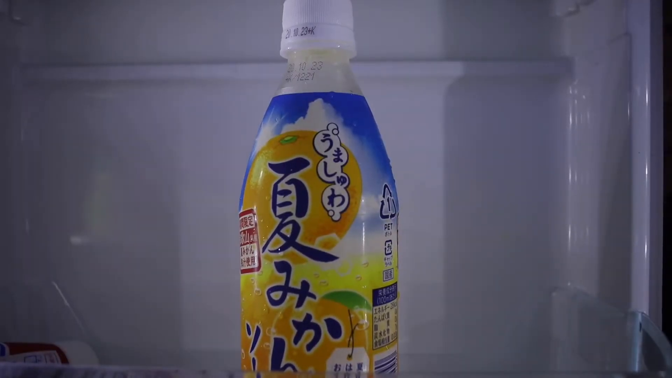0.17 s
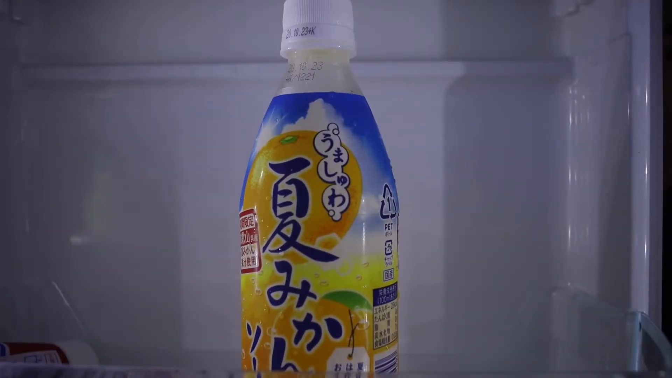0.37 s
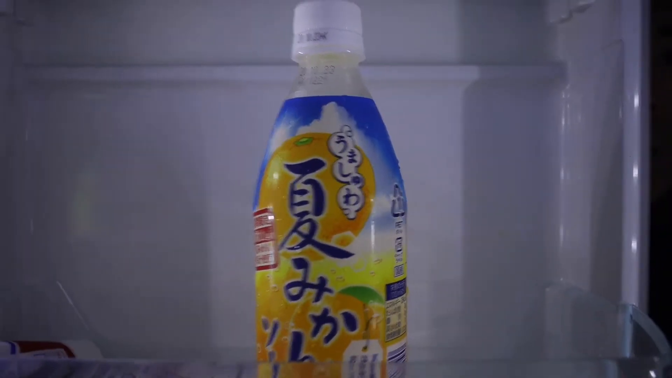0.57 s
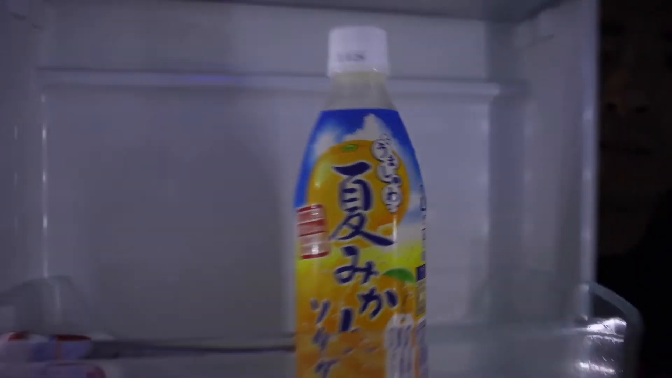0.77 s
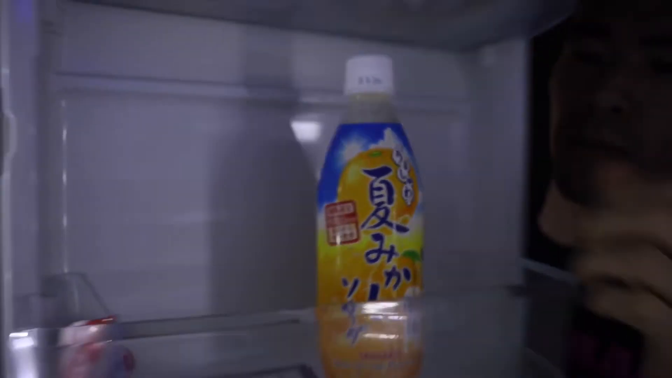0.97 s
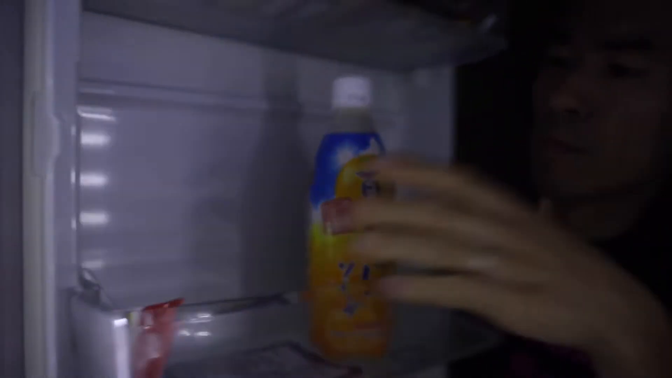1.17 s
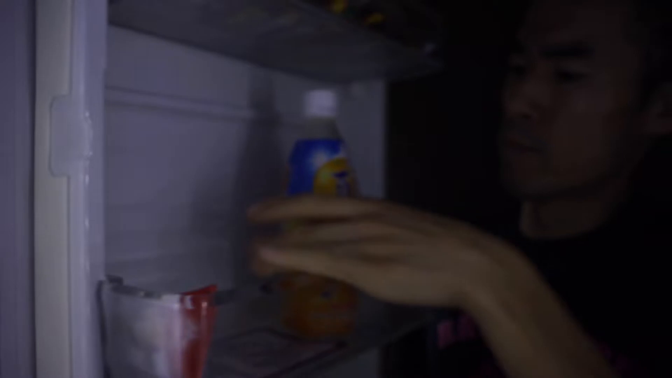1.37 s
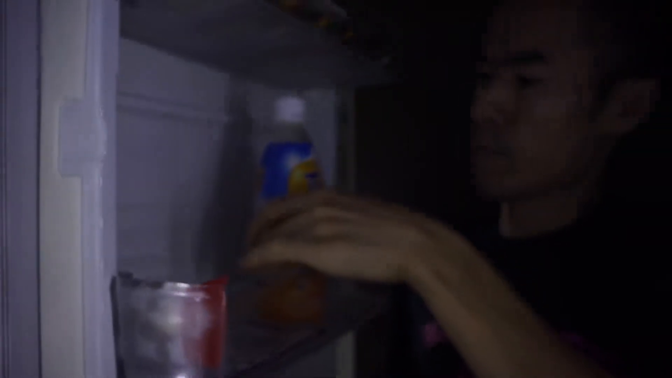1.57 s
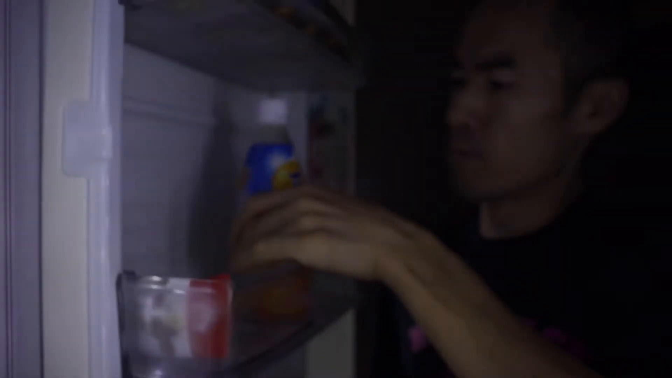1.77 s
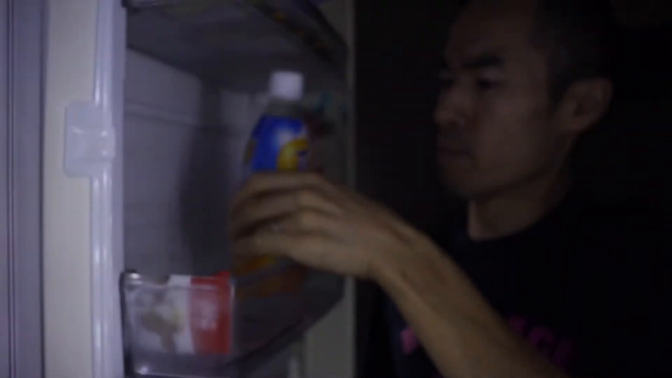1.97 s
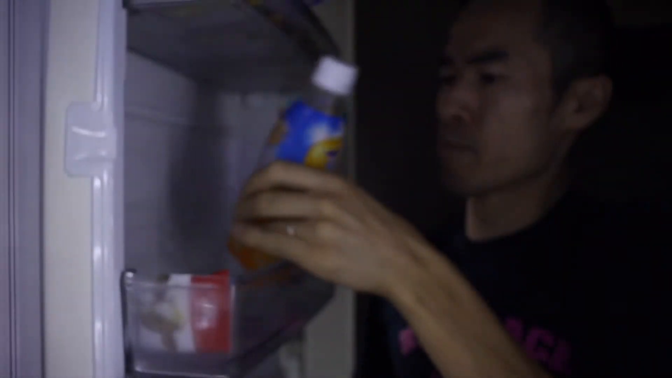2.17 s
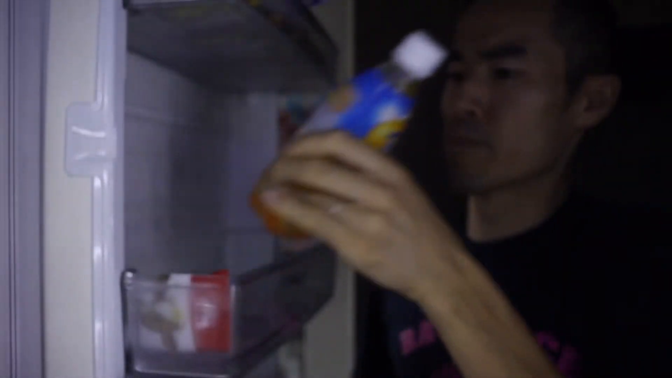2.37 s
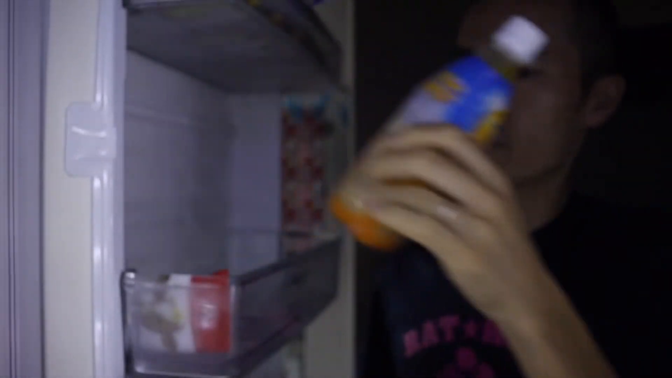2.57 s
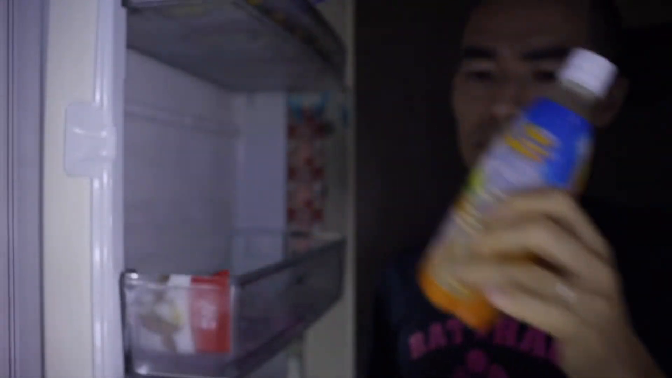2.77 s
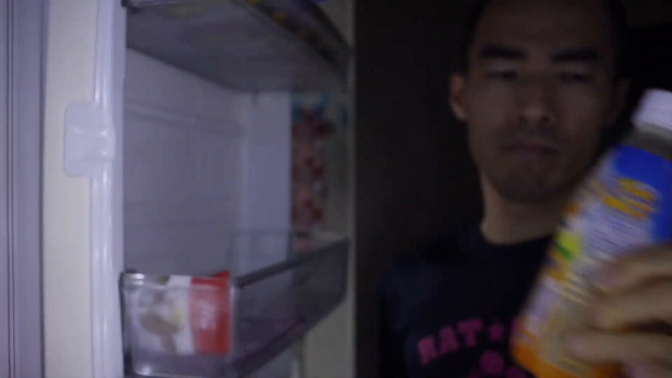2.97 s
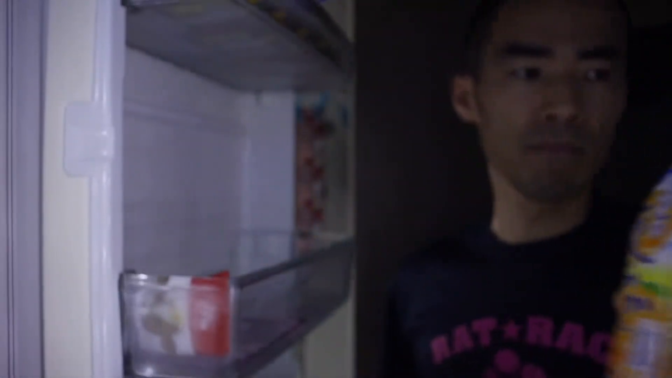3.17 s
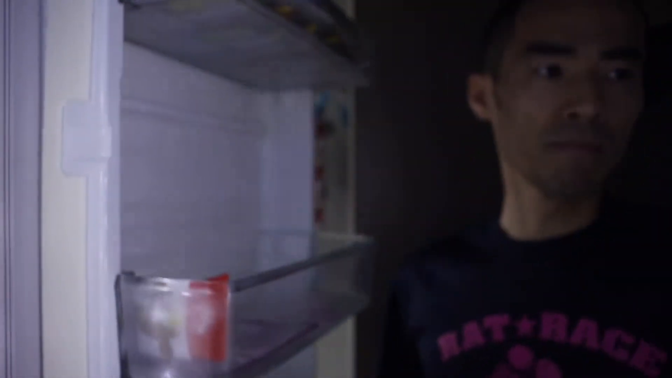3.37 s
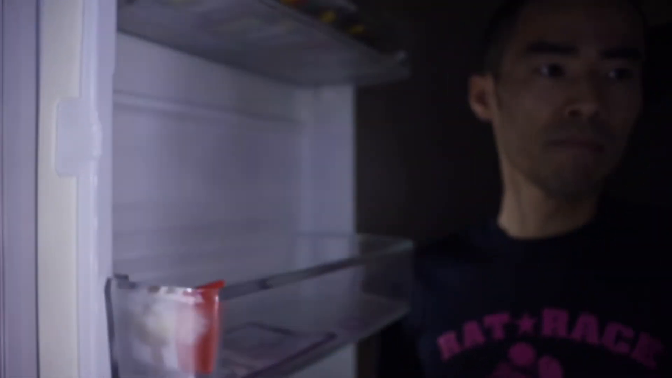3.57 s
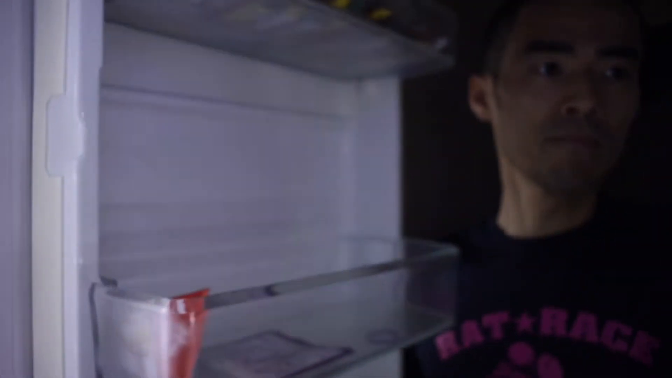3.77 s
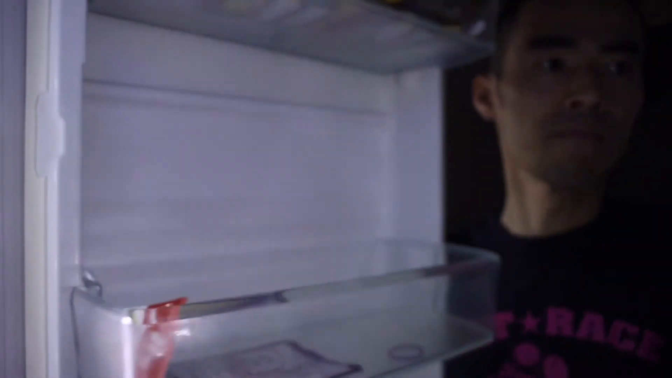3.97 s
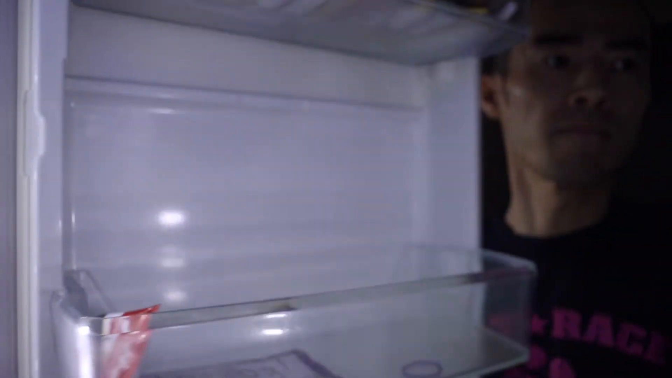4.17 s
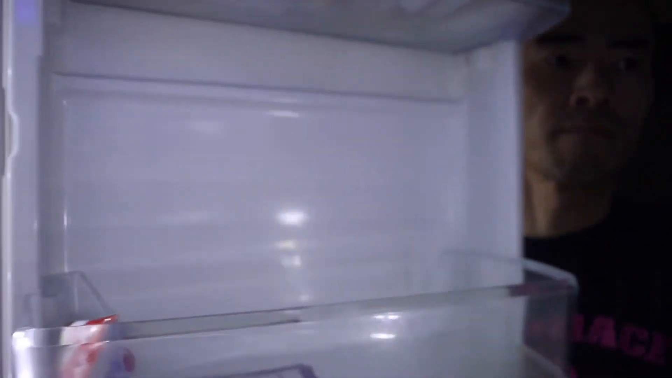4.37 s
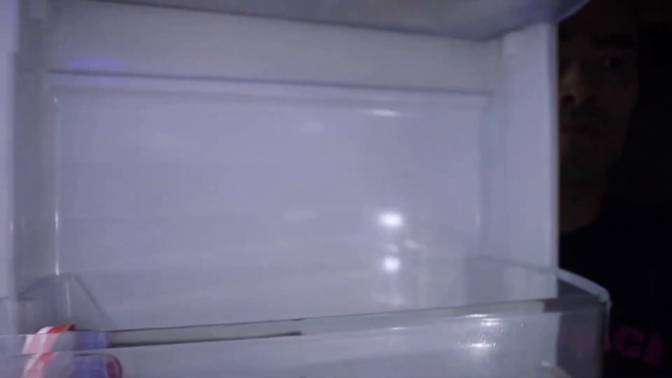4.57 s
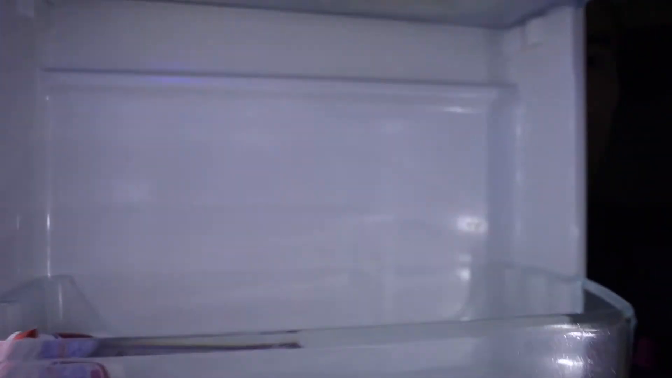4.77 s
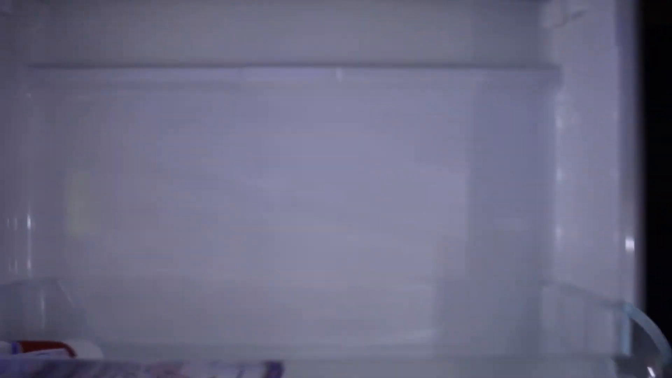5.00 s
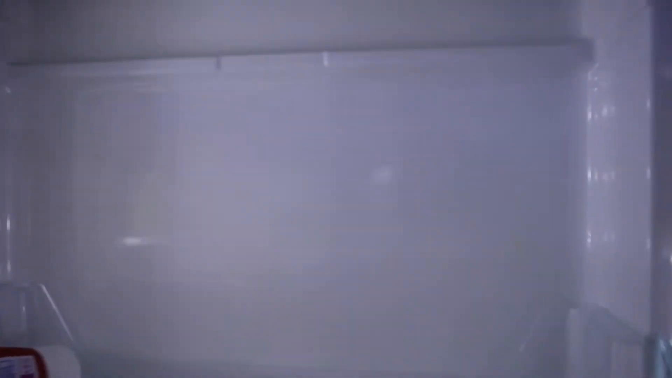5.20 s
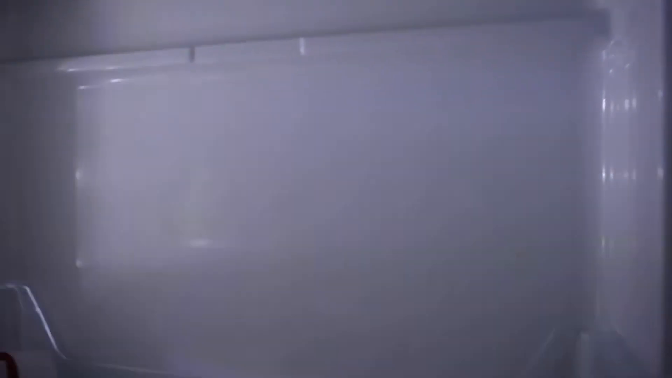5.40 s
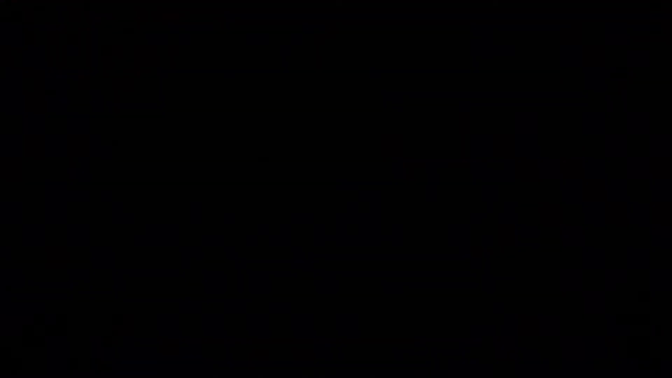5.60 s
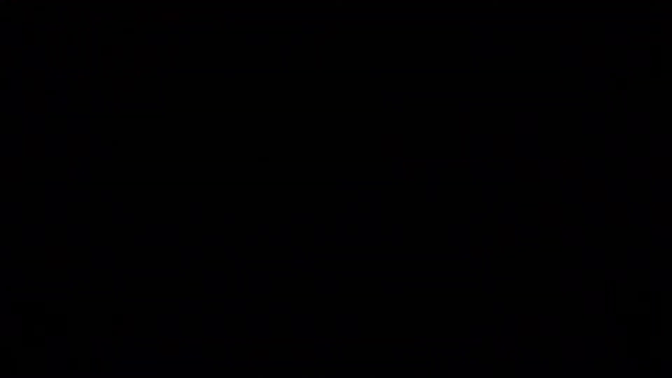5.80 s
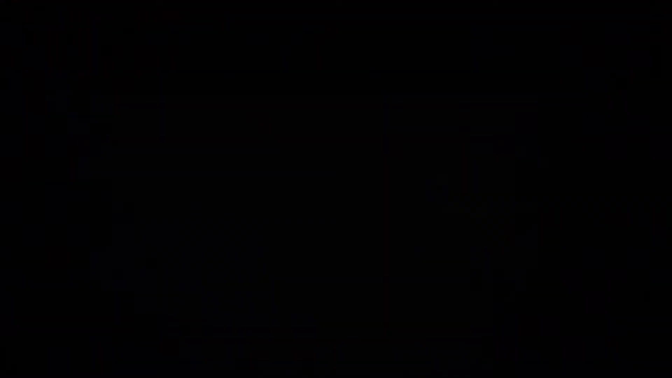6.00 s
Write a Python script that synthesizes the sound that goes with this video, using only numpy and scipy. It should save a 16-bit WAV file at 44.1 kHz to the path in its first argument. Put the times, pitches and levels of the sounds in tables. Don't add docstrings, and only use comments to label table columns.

```python
import sys
import numpy as np
from scipy import signal
from scipy.fft import rfft, irfft, next_fast_len
from scipy.io import wavfile
from scipy.ndimage import uniform_filter1d

SR = 44100
rng = np.random.default_rng(int(sys.argv[2]) if len(sys.argv) > 2 else 0)


def boost_factor(decibels):
    exponent = np.asarray(decibels, float) / 20
    return 10 ** exponent


def wav_record(signal):
    frames = np.transpose(np.atleast_2d(signal))
    bounded = np.clip(frames, -1, 1)
    quanta = np.round(bounded * 32767).astype(np.int16)
    wavfile.write(sys.argv[1], SR, quanta)


N = 266408

# frequency in Hz, level in dB per Hz.
HUSH = [(18, -31), (33, -0.5), (48, 2), (110, -8), (189, -5.5), (240, -13.5), (1220, -21.5), (15500, -35.5)]
HUSH_DB = -57.5

# frequency in Hz, level in dB, decay time T60 in seconds.
WALLS = [(91, -11, 0.14), (118, -4, 0.29), (151.6, -4, 0.2), (180, -2, 0.2), (230, -4.5, .12),
         (265.5, -3, 0.14), (311.4, -2, 0.17), (354, -7, 0.13), (412, -6.5, 0.099)]
RACKS = [(485.8, -1, 0.054), (534, -1.5, 0.088), (693, -3, 0.073), (774, -4.5, 0.084), (880, 2, 0.068),
         (926, -15.5, 0.028), (1160, -12.5, 0.029), (1350, -3.5, 0.079), (1590, -7.5, .03),
         (1756, 8.5, 0.017), (1920, 1, 0.04), (2085, -5.5, 0.036), (2270, -4.5, 0.028)]
LINER = [(2748, 3, 0.018), (3080, 0, 0.017), (3185, 1, 0.014), (3808, -8, 0.03), (3932, -13, 0.027),
         (4200, -3, 0.0092), (4490, -8.5, 0.027), (5227, -5.5, .012), (6960, -8, 0.013)]
BOTTLE = [(770, -2, .06), (860, -3, .07), (1116, -1.5, 0.058), (1370, 4, .055), (1900, -4, .03),
          (1800, 4.5, .03), (2150, 0, .04), (2440, 1, 0.028)]
LATCH = [(650, -6, 0.03), (925, 4, 0.088), (1204, 8, 0.027), (1370, -5, .04), (1800, 5.5, 0.037),
         (2040, 4, 0.039)]
FRAME = [(564, 2, 0.053), (885, -6, 0.056), (1140, -15, 0.03), (1375, 11, 0.05), (1690, 9, .015),
         (1900, 14.5, 0.015), (2056, 1, 0.033), (2360, 5, 0.032)]

# time in seconds, level in dB.
SWAY = [(0, -47), (.3, -45.5), (.75, -46.5), (.95, -51), (1.75, -51.5), (1.95, -63), (2.7, -71),
        (3.1, -60.5), (3.55, -52), (4.1, -54), (5.08, -60), (5.28, -38), (5.54, -41.5), (6.04, -46)]
# time in seconds, level in dB.
SHAKE = [(0, -45.5), (.27, -51), (.79, -47), (1.2, -49), (1.41, -34), (1.72, -51), (2.15, -61), (3.05, -63),
         (3.22, -53), (3.58, -53.5), (3.75, -64.5), (4.07, -43.5), (4.38, -61.5), (5.0, -61), (5.27, -35),
         (5.54, -35.5), (5.72, -42.5), (6.04, -46.5)]
# time in seconds, level in dB.
BRUSH = [(0, -59.5), (.9, -60.5), (1.05, -52), (1.28, -55), (1.33, -48), (1.48, -60.5), (1.8, -57.5),
         (2.1, -67.5), (3.1, -62.5), (3.7, -66), (4.9, -70.5), (5.28, -60.5), (5.7, -64.5), (6.04, -74.5)]
# frequency in Hz, level in dB.
RUBBED = [(300, -10), (450, 3.5), (900, 0), (1100, -8.5), (1370, 1), (1600, -6.5), (2400, -13),
          (3200, -35.5)]

# start in seconds, end in seconds, rack level in dB, liner in dB above it.
SCRAPES = [
    (0.164, 0.217, -36.5, -10.5),
    (1.215, 1.303, -40, -24),
    (1.987, 2.086, -65.5, -12),
    (4.001, 4.054, -50, -11),
    (4.039, 4.08, -58, -5),
    (3.105, 3.156, -59, -4.5),
    (5.258, 5.374, -38.5, -20),
    (5.53, 5.577, -48, -6.5),
]
# start in seconds, peak in dB, fade in ms, low edge in Hz, high edge in Hz.
RUSTLES = [(.008, -42, 5.4, 1000, 2200), (.208, -15.5, 5.3, 1500, 5000), (.567, -34, 4, 1800, 3730),
           (.815, -41, 5, 300, 1500), (1.335, -24, 14, 600, 2300), (1.376, -21.5, 8.4, 600, 2400),
           (1.24, -26, 13.6, 201, 418), (1.98, -50.5, 25, 1602, 2100), (3.11, -39.5, 8.5, 699, 5000),
           (3.232, -47, 11, 500, 1100), (3.39, -43, 6, 1200, 2290), (3.578, -37, 5.8, 600, 3500),
           (4.04, -38, 9.7, 3010, 6000), (4.142, -46, 6.8, 1600, 2198), (5.045, -49, 5, 1700, 3000),
           (5.545, -39.5, 13, 2500, 14000), (5.692, -42, 6.1, 900, 2090), (5.735, -48, 8.6, 1100, 1600),
           (5.79, -50, 5.6, 1000, 2000), (5.838, -46, 5.9, 1000, 1700), (5.898, -44, 5.6, 1000, 2100),
           (5.94, -42.5, 6.8, 1000, 2000), (5.96, -38, 4.9, 1200, 3300), (5.97, -36, 3.8, 400, 4900),
           (5.996, -37.5, 7.5, 1000, 2360), (4.1, -35, 5, 2000, 5000), (4.052, -39, 8, 3300, 5300),
           (4.92, -58, 25, 4050, 4350)]
# start in seconds, peak in dB, fade in ms, low edge in Hz, high edge in Hz.
EDGES = [(.5725, -27, 3, 600, 3500), (1.2, -37, 2, 7000, 15500), (1.3108, -10, 2.7, 6400, 10400),
         (1.3108, -18, 2.03, 12990, 16500), (5.107, -34, 5, 4000, 15500), (5.134, -36, 4, 8000, 15500),
         (5.3668, -8.5, 3.3, 2500, 3800), (5.835, -44, 2, 12000, 16000), (3.884, -25, 5, 3500, 4400),
         (5.975, -30, 6.1, 680, 2400), (5.975, -41, 5, 2800, 6000), (5.135, -25, 5, 1500, 5500),
         (5.0915, -23, 4.5, 2400, 3200), (5.3095, -38, 5, 5000, 15500), (5.549, -40, 3, 3000, 14000)]
# start in seconds, peak in dB, fade in ms, low edge in Hz, high edge in Hz.
SNAPS = [
    (1.3106, -3.5, 1.4, 5000, 15100),
    (1.3106, -10, 6, 1400, 2000),
    (1.311, -18.5, 17, 1199, 8500),
    (5.367, -3, 0.99, 4000, 15000),
    (5.367, -5.5, 3.9, 1800, 7500),
    (5.368, -20.5, 12, 2500, 13000),
    (5.2394, -25.5, 2, 3000, 15000),
]

# time in seconds, peak in dB, wall pitch in Hz.
OPENING = [(0.088, -25.5, 118), (0.13, -22, 118), (0.147, -18.5, 115), (0.219, -21, 412),
           (0.227, -23.5, 149), (0.229, -22.5, 276), (0.544, -24, 243), (0.578, -23, 242),
           (0.644, -35.5, 210), (0.676, -24, 248), (0.905, -30.5, 96), (0.966, -24, 283)]
ROCKING = [(1.25, -21, 267.5), (1.274, -19, 247), (1.317, -24, 407), (1.345, -33, 261), (1.38, -25, 350),
           (1.423, -28.5, 169), (1.465, -30.5, 294), (1.713, -24, 206), (1.894, -26.5, 138.4),
           (2.012, -42, 192), (2.549, -47, 159)]
SWINGING = [(3.098, -25.5, 130), (3.124, -26, 180), (3.159, -32, 167.4), (3.239, -39, 182),
            (3.394, -31.5, 303), (3.434, -33.5, 303), (3.514, -25.5, 304), (3.583, -23.5, 311.6),
            (3.89, -26.5, 104.5), (3.954, -28.5, 112), (4.048, -21.5, 106), (4.164, -30.5, 260),
            (4.29, -35, 118), (4.444, -31, 170.2), (4.94, -41.5, 95.5)]
SHUTTING = [(5.043, -24, 106), (5.092, -22.5, 131.5), (5.125, -15, 85.7), (5.162, -16, 87.4),
            (5.199, -35, 86.1), (5.241, -16, 318), (5.251, -13.5, 180), (5.299, -20, 90.5),
            (5.551, -21, 92), (5.605, -25, 92), (5.702, -28.5, 91), (5.75, -31.5, 134), (5.832, -31, 112.4),
            (5.978, -28.5, 88.8)]
# frequency in Hz, peak in dB, T60 in seconds, start in seconds.
THUMP = [
    (74, 6.5, .105, 5.3787),
    (75.4, -14.5, .95, 5.3787),
    (42, -11, .1, 5.376),
    (115, -4, .06, 5.3695),
    (201, -28, .8, 5.42),
    (170, -17, .1, 5.385),
]

# start in seconds, peak in dB, pitch in Hz, T60 in seconds.
TONES = [(.045, -39, 4400, 0.046), (.09, -23, 1944, 0.04), (0.158, -34, 3900, 0.07),
         (.219, -18.5, 1960, 0.046), (1.312, -7, 3150, 0.026), (1.318, -18.5, 780, 0.081),
         (1.312, -16, 1373, .07), (.228, -20, 528, 0.085), (1.895, -28, 489, 0.1),
         (3.885, -25, 3100, 0.041), (3.886, -25, 1910, 0.04), (0.540, -26.5, 1365, 0.058),
         (0.762, -38.5, 1375, 0.041), (5.367, -8, 1700, 0.029), (5.378, -22, 1390, 0.058),
         (5.163, -20.5, 3900, 0.018), (5.2393, -6, 1185, 0.022), (5.241, -25, 937, 0.11),
         (5.974, -37, 2640, 0.031)]
# start in seconds, peak in dB, pitch in Hz, T60 in seconds.
SEAL_RING = (0.225, -19, 118, .27)
# start in seconds, peak in
# dB, pitch in Hz, T60 in seconds.
RINGS = [(.092, -28.5, 330, 0.064), (.128, -27, 337, .08), (.219, -14.5, 780, 0.045),
         (.222, -27, 1140, 0.09), (.535, -28, 135, .15), (.6, -44, 140, .15), (.665, -24, 132, 0.077),
         (.54, -26, 704, .04), (1.311, -20, 5440, 0.037), (1.311, -16, 5920, 0.039),
         (1.311, -16.5, 6810, 0.025), (1.311, -15, 3670, 0.04), (1.311, -10, 2830, 0.042),
         (1.311, -23, 4590, .04), (3.59, -34.5, 748, .06), (3.893, -34, 510, 0.072), (3.93, -52, 1900, .2),
         (3.955, -45, 856, .09), (3.94, -58, 4250, .2), (4.012, -43, 844, .1), (4.03, -37.5, 1915, 0.13),
         (4.075, -51.5, 2750, .2), (4.165, -47, 1370, 0.083), (5.045, -49, 1900, 0.034),
         (5.246, -12, 925, .035), (5.345, -21, 149, .12), (5.365, -9, 285, 0.042),
         (5.366, -15.5, 385, 0.045), (5.372, -22, 542, .09), (5.4, -35, 430, 0.5), (5.43, -35, 330, 1.1),
         (5.49, -26, 201, 0.14), (5.607, -44, 2040, 0.035), (5.974, -34.5, 1900, 0.038),
         (5.974, -34.5, 625, 0.047), (1.311, -12.5, 1632, .06), (1.312, -11.5, 1805, 0.051),
         (1.555, -36.5, 305, .18), (1.39, -26.5, 171, 0.19), (2.01, -41.5, 190, 0.34), (3.17, -36, 180, .2),
         (3.6, -34.5, 191, .2), (3.585, -36.5, 100, 0.24), (5.39, -15, 175, 0.082),
         (5.405, -21.5, 253, 0.076), (5.54, -25.5, 205, .15), (5.55, -35.5, 535, .12),
         (5.367, -9, 1900, 0.038), (5.95, -33, 60, .2),
         (1.25, -27, 1250, .07),
    (1.25, -29, 1800, .05),
    (.67, -30, 1370, .06),
    (5.44, -39, 980, .15),
    (5.38, -24, 900, .08),
    (5.368, -17, 6300, .02),
    (5.4, -31, 250, .6),
    (5.74, -41, 520, .2),
]

# time in seconds, rack peak in dB, liner in dB above it,
# top crack in dB above the rack, rack pitch in Hz.
SEATING = [
    (5.2907, -30, -2, -10, 1600),
    (5.3115, -30.5, -6, -5, 1550),
    (5.3396, -26.5, -8, -14, 1560),
    (5.35, -27, -8, -15, 1900),
]
# time in seconds, rack peak in dB, liner in dB above it, rack pitch in Hz.
KNOCKS = [(0.011, -32, -12, 1500), (0.142, -19.5, -5, 910), (0.156, -26.5, 0.5, 880), (0.228, -21, -7, 480),
          (0.536, -19, -40, 820), (0.570, -23.5, -11.5, 1350), (0.667, -23, -25.5, 850),
          (0.82, -42, -19.5, 854), (0.902, -40.5, -18, 626), (1.25, -24, -36, 783), (1.268, -29, -28, 670),
          (1.345, -14.5, -13, 850), (1.496, -32, -29, 730), (1.712, -28.5, -20, 860),
          (1.892, -32.5, -29.5, 825), (3.098, -36, -12, 736), (3.391, -35, -21, 904),
          (3.433, -41.5, -18.5, 671), (3.516, -26.5, -16.5, 744), (3.584, -32, -11.5, 755),
          (3.884, -22.5, 2, 890), (3.954, -40.5, -7, 850), (4.046, -27.5, -11.5, 1990),
          (4.148, -45, -22, 1920), (4.16, -30, -36, 880), (4.286, -34, -24, 870), (5.092, -24.5, -5, 1010),
          (5.161, -15.5, -2, 953), (5.254, -20.5, -23, 640)]
# time in seconds, rack peak in dB, top crack in dB above it, rack pitch in Hz.
TICKS = [(0.044, -30.5, -10, 900), (0.089, -23, -8.5, 1920), (0.1227, -19, -1, 1350),
         (0.206, -13, -9, 1840), (0.218, -11, -7.5, 1950), (0.755, -32, -6.5, 1295),
         (0.965, -29.5, -11, 926), (1.1, -38.5, 4, 1420), (1.383, -20.5, -24, 1380), (1.423, -25, -21, 720),
         (1.684, -40.5, -12, 880), (3.124, -33.5, -15, 880), (3.16, -39.5, -11, 650),
         (4.034, -30, -11, 1920), (4.101, -36, -8, 2100), (5.108, -24, -6, 920), (5.134, -18, -20, 602),
         (5.544, -34, -3.5, 851), (5.608, -36, -2, 2000), (5.654, -38.5, -8, 600), (5.836, -45.5, -2, 1380),
         (5.974, -32.5, -22, 1370)]
# time in seconds, peak in dB,
# liner in dB above it, top crack in dB above the peak, pitch in Hz.
GRAB = (1.3105, -2.5, -2., -7, 1625)
CATCH = (5.2388, -10., -12, -19, 1170)
SLAM = (5.366, -4, 0, -11, 2000)

# frequency in Hz, width in Hz, level in dB, delay in cycles.
CROSS_MODES = [(290, 110, -9, .25), (760, 200, -14, .5)]

LAG_S = 0.00011
PAN_DB = -3


def band(x, lo_hz, hi_hz):
    return signal.sosfilt(signal.butter(2, [lo_hz, hi_hz], "band", fs=SR, output="sos"), x)


def highpass(x, hz, order):
    return signal.sosfilt(signal.butter(order, hz, "high", fs=SR, output="sos"), x)


def peak(x, db):
    return x * boost_factor(db) / np.abs(x).max()


def add(out, s, sound):
    i = int(s * SR)
    out[:, i:i + sound.shape[1]] += sound[:, :N - i]


def convolve(x, response):
    return signal.fftconvolve(np.atleast_2d(x), response, axes=1)


def curve(table):
    s, db = np.transpose(table)
    return np.interp(np.arange(N) / SR, s, db)


def walk(rate_hz):
    k = int(SR / rate_hz)
    held = rng.standard_normal(512)[np.arange(N) // k]
    return 2.1 * uniform_filter1d(uniform_filter1d(held, k), k)


def shaped(table, rows=2):
    size = next_fast_len(N)
    hz = np.maximum(np.fft.rfftfreq(size, 1 / SR), 1)
    f, db = np.transpose(table)
    gain = boost_factor(np.interp(np.log(hz), np.log(f), db))
    x = irfft(rfft(rng.standard_normal((rows, size))) * gain, size)[:, :N]
    return x / x.std()


def late_left(noise, lag_s):
    return np.array([np.roll(noise, int(lag_s * SR)), noise])


def ring(modes, scatter_db, apart, lag_s, size=4096):
    hz, db, t60 = np.array(modes, float).T[:, :, None]
    detune, phase, loudness, sign = rng.standard_normal((4, len(modes), 1))
    t = np.arange(size) / SR
    hz = hz * (1 + .012 * detune)
    skew = np.pi * hz * lag_s + apart * np.minimum(hz / 1500, 1) * phase
    fade = boost_factor(db + scatter_db * loudness) * np.sign(sign) * np.exp(-np.log(1000) * t / t60)
    fade = fade * np.minimum(t * hz, 1)
    return np.array([(fade * np.sin(2 * np.pi * hz * t + k * skew)).sum(0) for k in (-1, 1)])


def hush():
    mid, side = shaped(HUSH)
    side = highpass(side, 450, 1)
    return boost_factor(HUSH_DB) * np.array([mid + side, mid - side])


def fizz():
    out = np.zeros((2, N))
    for _ in range(12):
        s, hz = rng.uniform(2.15, 2.7), rng.uniform(3603, 6000)
        wisp = band(rng.standard_normal((2, 2048)) * np.hanning(2048), hz, 1.06 * hz)
        add(out, s, peak(wisp, -62))
    return out


def door_sway():
    rumble = shaped([(20, -26), (38, -5), (60, 10.5), (80, 12), (120, -47.5)], rows=1)
    return rumble * boost_factor(curve(SWAY) + 1.4 * walk(8.4) - 0.5)


def rubbing():
    wall_db = curve(SHAKE)
    rack_db = -72 + 0.87 * (wall_db - wall_db.min())
    liner_db = curve(BRUSH) + 0.3 * (wall_db - wall_db.mean()) + 1

    grains = rng.standard_normal(N) * boost_factor(2.75 * walk(40))
    damped = [(hz, db - 0.96 * np.log2(hz / 150), .6 * t60) for hz, db, t60 in WALLS]
    response = ring(damped, 1.8, .5, LAG_S)
    walls = convolve(grains * boost_factor(wall_db - 0.5), response)[:, :N]
    walls = walls / grains.std() / np.sqrt((response ** 2).sum() / 2)

    racks = shaped(RUBBED, rows=3)
    racks = (0.61 * racks[:2] + racks[2]) * boost_factor(rack_db + 2.5 * walk(40))
    scuff = shaped([(1500, -11), (3000, -5), (4200, -5), (7000, -10.5), (15000, -15)], rows=3)
    scuff = (scuff[:2] + 0.37 * scuff[2]) * boost_factor(liner_db + 1.124 * walk(40))
    return walls + racks + scuff


def scrapes():
    out = np.zeros((2, N))
    for start, end, db, liner_db in SCRAPES:
        swell = np.linspace(0, 1, int((end - start) * SR)) ** 1.1
        swell = swell * np.minimum(8 * (1 - swell), 1)
        noise = rng.standard_normal((3, len(swell)))
        slips = np.pad(swell * (noise[2] + .6 * noise[:2]), ((0, 0), (0, 512)))
        racks = band(band(slips, 400, 1500), 300, 2600)
        liner = band(slips, 3400, 7000)
        add(out, start, boost_factor(db) * (racks / racks.std() + boost_factor(liner_db) * liner / liner.std()))
    return out


def burst(rows, swell):
    out = np.zeros((2, N))
    for s, db, fade_ms, lo_hz, hi_hz in rows:
        noise = rng.standard_normal((3, 4096))
        age = np.arange(4096) / SR / (fade_ms / 1000)
        contacts = late_left(noise[2], LAG_S) + 0.67 * noise[:2]
        add(out, s, peak(band(contacts * age ** swell * np.exp(-age), lo_hz, hi_hz), db))
    return out


def tones(rows):
    out = np.zeros((2, N))
    for s, db, hz, t60 in rows:
        add(out, s, peak(ring([(hz, 0, t60)], 0, 0.33, 0.19 * LAG_S, size=16384), db))
    return out


def thuds():
    out = np.zeros((2, N))
    stages = [(OPENING, 0.085), (ROCKING, 0.17), (SWINGING, 0.11), (SHUTTING, 0.086)]
    for rows, wall_t60 in stages:
        for s, db, wall_hz in rows:
            near = [(hz, g - 9 * abs(np.log2(hz / wall_hz)) - 4, t60) for hz, g, t60 in WALLS]
            response = ring(near + [(wall_hz, 0, wall_t60)], 2.1, 0.43, LAG_S, size=8192)
            add(out, s - .002, peak(convolve(np.hanning(96), response), db))
    return out


def thump():
    t, out = np.arange(N) / SR, 0
    for hz, db, t60, s in THUMP:
        age = np.maximum(t - s, 0)
        rise = np.minimum(age * hz / .8, 1)
        fade = np.exp(-np.log(1000) * age / t60)
        out = out + boost_factor(db) * rise * fade * np.sin(2 * np.pi * hz * age)
    return out


def knock(out, row, modes, pan_db):
    s, db, liner_db, crack_db, rack_hz = row
    contact_s = (6.6 - 0.26 * db) / 1000
    rise_s = np.clip(-.0002 * (liner_db + 10), .0001, .005)
    t = np.arange(4096) / SR
    fade = np.exp(-t / contact_s) * np.minimum(t / rise_s, 1)

    noise = rng.standard_normal((3, 4096))
    contact = fade * noise[2]
    contact[int(rise_s * SR / 2)] = 1.4 * np.sqrt((contact ** 2).sum())
    lag_s = LAG_S * (1 + .4 * rng.standard_normal())
    crunch = fade * (late_left(noise[2], lag_s) + 0.65 * noise[:2])

    near = [(hz, g - 6 * abs(np.log2(hz / rack_hz)), t60) for hz, g, t60 in modes] + [(rack_hz, -1.5, .055)]
    part = peak(convolve(contact, ring(near, 1.2, .45, lag_s))[:, :4096], 0)
    top_hz = np.clip(1.7 * rack_hz, 1400, 2600)
    part = part + peak(band(band(crunch, .33 * rack_hz, top_hz), 170, 1.2 * top_hz), -0.87)

    response = ring(LINER, 4.5, 0.99, 0.23 * lag_s, size=1024)
    liner = peak(convolve(contact, response)[:, :4096], -2.8)
    liner = liner + peak(band(crunch, 2300, 5000), -3)
    crack = band(crunch * np.sqrt(fade), 2400, 12000)

    pan = boost_factor(np.array([[pan_db], [-pan_db]]) / 2)
    sound = peak(part, db) * pan + peak(liner, db + liner_db) * pan ** 0.5
    add(out, s - rise_s / 2, sound + peak(crack, db + crack_db))


def seating():
    out = np.zeros((2, N))
    for row in SEATING:
        knock(out, row, RACKS, PAN_DB)
    return out


def knocks():
    out = np.zeros((2, N))
    blows = [(GRAB, BOTTLE), (CATCH, LATCH), (SLAM, FRAME)]
    for s, db, liner_db, hz in KNOCKS:
        blows.append(((s, db, liner_db, -31, hz), RACKS))
    for s, db, crack_db, hz in TICKS:
        liner_db = -13 if .4 < s < 4 else -0.5
        blows.append(((s, db, liner_db, crack_db, hz), RACKS))
    for row, part in blows:
        knock(out, row, part, PAN_DB + 0.75 * rng.standard_normal())
    return out


def cabinet(x):
    t60 = 0.16
    t = np.arange(16384) / SR
    noise = rng.standard_normal((2, len(t)))
    dull = signal.sosfilt(signal.butter(1, 1800, fs=SR, output="sos"), noise)
    tail = dull * boost_factor(-60 * t / t60) + 0.62 * noise * boost_factor(-60 * t / (0.4 * t60))
    return convolve(x, tail / np.sqrt((tail ** 2).sum() / 2))[:, :N]


def crosswise(x):
    mid, side = (x[0] + x[1]) / 2, (x[0] - x[1]) / 2
    side = highpass(side, 90, 1)
    for hz, width_hz, db, cycles in CROSS_MODES:
        b, a = signal.iirpeak(hz, hz / width_hz, fs=SR)
        swing = signal.lfilter(b, a, signal.lfilter(b, a, mid))
        side = side + boost_factor(db) * np.pad(swing, (int(cycles * SR / hz), 0))[:N]
    return np.array([mid + side, mid - side])


def scene():
    background = hush() + fizz() + door_sway() + rubbing()
    hits = knocks() + tones(TONES + [SEAL_RING]) + scrapes()
    tail = boost_factor(-16) * cabinet(highpass(hits, 350, 2))
    body = thuds() + thump()
    loose_parts = tones(RINGS) + seating() + burst(RUSTLES, swell=0.99)
    sharp_edges = burst(SNAPS, swell=0) + burst(EDGES, swell=0)
    return crosswise(background + hits + tail + body + loose_parts + sharp_edges)


def band_limit(x):
    return signal.sosfilt(signal.butter(12, 16620, fs=SR, output="sos"), x)


def record(dry):
    x = np.clip(highpass(dry, 38, 2), -1, 1)
    x = signal.sosfilt(signal.ellip(8, .2, 60, 16480, fs=SR, output="sos"), x)
    return band_limit(x)


dry = scene()
out = record(dry)
wav_record(out)
```